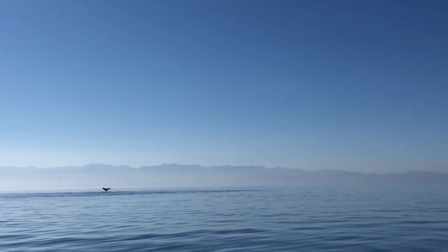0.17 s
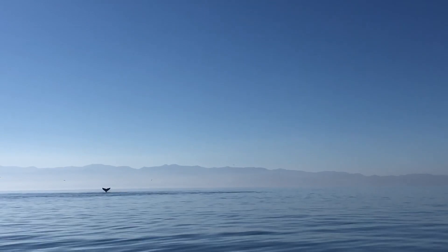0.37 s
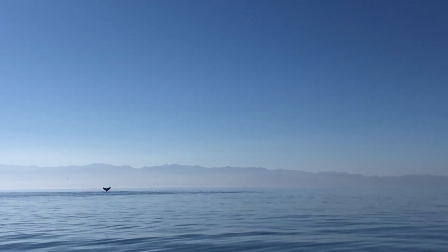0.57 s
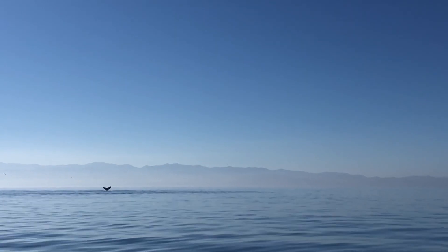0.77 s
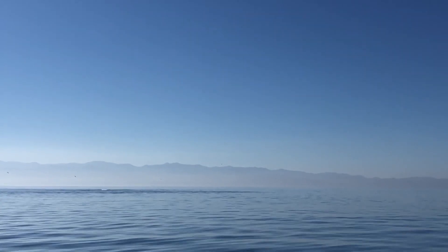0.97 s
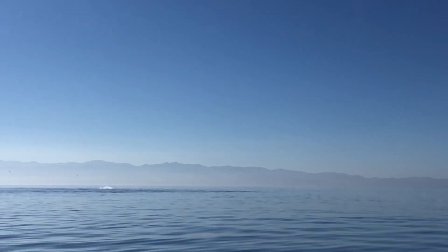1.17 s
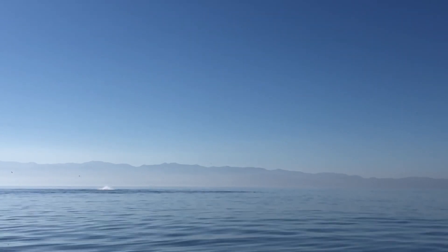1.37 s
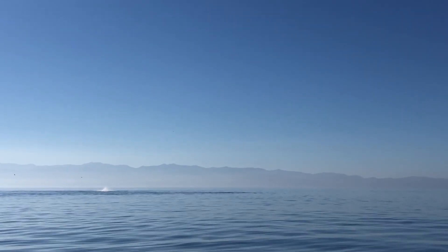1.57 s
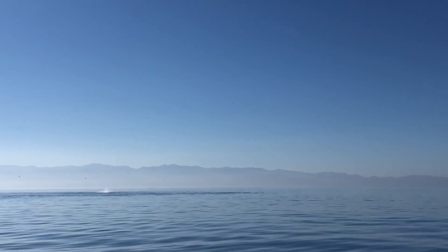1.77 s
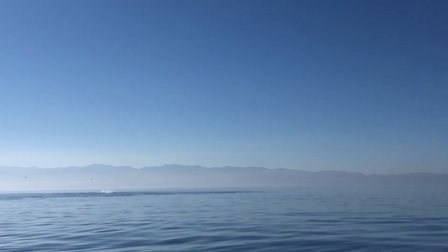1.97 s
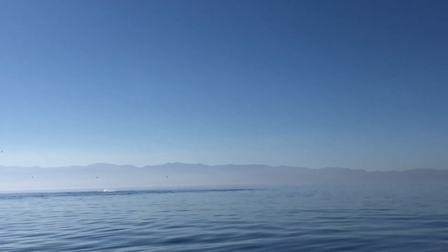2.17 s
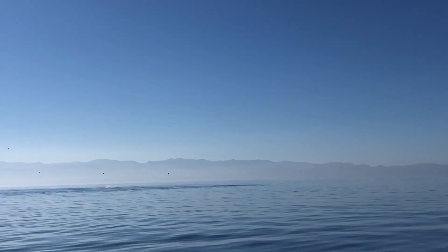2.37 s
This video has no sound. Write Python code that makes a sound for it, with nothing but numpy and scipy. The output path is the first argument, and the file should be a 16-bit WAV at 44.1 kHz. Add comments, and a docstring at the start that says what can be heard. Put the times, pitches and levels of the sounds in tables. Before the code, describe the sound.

A distant whale tail slaps the water with one short thump, over a low boat engine idle

```python
"""Calm open sea from a small boat: after a moment of silence, the close engine idles over an even sea hiss.
It is a sum of shaft-speed partials, with a low hum, a light rattle on every turn and throbbing noise.
A few droplets tick and fizz near the hull throughout, as short bands of noise and single-sample clicks.
Late on, far off, a whale slaps its tail: tearing noise bursts, a crack of short rings as the flukes land
flat, the falling tone of the trapped air as a thump, then a low noise band as bubbles rumble on."""
import sys
import numpy as np
from scipy import signal
from scipy.fft import rfft, irfft, next_fast_len
from scipy.io import wavfile
from scipy.ndimage import map_coordinates

SR = 44100
rng = np.random.default_rng(int(sys.argv[2]) if len(sys.argv) > 2 else 0)


def persist_wave(psi):
    """Save psi, clipped to +-1, as 16-bit WAV."""
    counts = np.round(np.clip(psi, -1, 1) * 32767).astype(np.int16)
    wavfile.write(sys.argv[1], SR, np.atleast_2d(counts).T)


N = 110691  # samples, about 2.5 s

SHAFT_HZ = 28.246  # mean turns of the engine shaft per second

# colour of the water thrown up by the tail: pitch_hz, relative_level_db (per Hz)
SPRAY_COLOUR = [(100, -17), (180, -17), (320, -5), (520, 2.5), (750, -7.5), (1100, 0), (1700, -2),
                (2200, -17), (3300, -13), (4300, -27.5), (5300, -39), (7000, -72)]


def undb(db):
    """Decibels to gain."""
    return 10 ** (np.asarray(db) / 20)


def clock():
    """Time of every sample, in seconds."""
    return np.arange(N) / SR


def curve(x, points):
    """Straight lines through (x, value) points."""
    return np.interp(x, *np.array(points, float).T)


def spectrum_db(hz, points):
    """Straight lines through (Hz, dB) points on a log-frequency axis."""
    point_hz, point_db = np.array(points, float).T
    return np.interp(np.log(np.maximum(hz, 1)), np.log(point_hz), point_db)


def noise(gain):
    """Noise of rms 1, shaped by a function of frequency."""
    size = next_fast_len(N)
    spectrum = rfft(rng.standard_normal(size)) * gain(np.fft.rfftfreq(size, 1 / SR))
    shaped = irfft(spectrum, size)[:N]
    return shaped / shaped.std()


def coloured(points):
    """Noise of rms 1 with a (Hz, dB) spectrum."""
    return noise(lambda hz: undb(spectrum_db(hz, points)))


def band(centre_hz, width_hz):
    """Noise of rms 1 in one resonance, its width taken at half gain."""
    return noise(lambda hz: 1 / (1 + (2 * (hz - centre_hz) / width_hz) ** 2))


def walk(rate):
    """Smooth random drift with a spread near 1, through `rate` random points a second."""
    points = rng.standard_normal(size=4096)
    coarse = map_coordinates(points, [clock()[::8] * rate], mode="wrap")
    return coarse.repeat(8)[:N]  # each value holds for 8 samples


def burst(at, rise, decay):
    """Exponential swell up to a moment and decay after it (seconds)."""
    t = clock() - at
    return np.exp(-np.maximum(-t / rise, t / decay))


def splash():
    """The edge of the tail tears into the water in a few quick bursts of noise."""
    # bursts: peak_s, peak_level_db, rise_s, decay_s
    tears = [(1.836, -43, .006, .004), (1.8502, -28, .004, .003), (1.8572, -31, .001, .002),
             (1.8612, -26, .0015, .003), (1.873, -40, .002, .002)]
    envelope = sum(undb(db) * burst(at, rise, decay) for at, db, rise, decay in tears)
    return coloured(SPRAY_COLOUR) * envelope


def crack():
    """The tail lands flat in quick blows that share the same short rings; each throws a little spray."""
    # flat blows of the flukes: start_s, strength_db
    blows = [(1.8755, -7), (1.8822, 1.5), (1.8842, -2.5)]
    # rings of each blow: pitch_hz, level_db (before the strength of the blow), t60_s
    modes = [(400, -30, .04), (740, -23, .013), (1030, -21, .012), (1460, -18, .013), (1730, -24, .011),
             (2700, -35, .008), (3500, -42, .007)]
    contact_s, spray_db, spray_decay_s = .0005, -37, .0035  # spray level before the strength
    out, spray = 0, coloured(SPRAY_COLOUR)
    for at, strength_db in blows:
        t = np.maximum(clock() - at, 0)
        rings = sum(undb(db - 60 * t / t60) * np.sin(2 * np.pi * hz * t) for hz, db, t60 in modes)
        wet = undb(spray_db) * np.exp(-t / spray_decay_s) * spray
        onset = 1 - np.exp(-(t / contact_s) ** 2)
        out = out + undb(strength_db) * (wet - rings) * onset
    return out


def thump():
    """The pocket of air under the tail rings for a few cycles, falling in pitch."""
    start_hz, end_hz, sag_s = 350, 135, .006
    rise_s, decay_s = .004, .0053
    t = np.maximum(clock() - 1.8858, 0)
    # integral of a pitch that sags exponentially
    cycles = end_hz * t + (start_hz - end_hz) * sag_s * (1 - np.exp(-t / sag_s))
    envelope = (1 - np.exp(-(t / rise_s) ** 2)) * np.exp(-t / decay_s)
    return undb(-9) * envelope * np.sin(2 * np.pi * cycles)


def churn():
    """The bubble cloud rumbles on briefly after the thump, as a narrow low band of noise."""
    return undb(-37) * burst(at=1.93, rise=.026, decay=.09) * band(centre_hz=170, width_hz=16)


def engine():
    """The idling engine: hum, clatter and a rush that throbs with the two firings of each turn."""
    # rough noise of engine and exhaust water: pitch_hz, relative_level_db (per Hz)
    rush_colour = [(25, -29), (45, -7), (110, 4.5), (160, 1.5), (220, -7.5), (360, 1), (480, -6.5),
                   (800, -15.5), (1100, -10), (1600, -23), (2250, -17.5), (2650, -26), (3150, -31),
                   (3800, -27), (4400, -33.5), (5200, -35), (6500, -41.5), (15000, -57.5)]
    # level of that noise before drift and throb: time_s, level_db
    rush_level = [(.1, -47), (.5, -47), (.95, -45), (1.2, -45.5), (1.5, -45.5), (1.8, -46.5), (2.05, -45.5),
                  (2.5, -47.5)]
    speed_wander = .00115  # share of the shaft rate
    turns = np.cumsum(SHAFT_HZ * (1 + speed_wander * walk(5.914))) / SR
    level_db = curve(clock(), rush_level) + 0.67 * walk(11.26)
    throb = 1 + 0.19 * np.sin(4 * np.pi * turns)
    rush = undb(level_db) * coloured(rush_colour) * throb
    return hum(turns) + casing(turns) + rush


def hum(turns):
    """Low partials of the exhaust, each wavering a little; two regions swell and fade."""
    # partials: order (multiple of the shaft rate), rms_level_db (before waver and swells)
    partials = [(2, -35.5), (3, -48.5), (4, -38.5), (6, -56), (7, -58.5), (8, -48.5), (9, -50.5),
                (10, -56.5), (11, -62.5), (12, -43), (14, -55)]
    # swell of the low middle of the hum: time_s, change_db
    low_swell = [(.1, 4), (.45, 5), (.6, 4), (.8, -6), (1.15, 6), (1.4, -4), (1.6, -14), (1.78, 7.5),
                 (1.95, 13.5), (2.2, 7.5), (2.45, 14.5)]
    # swell of the upper hum: time_s, change_db
    upper_swell = [(.1, 2.5), (.4, -2), (.7, -0.5), (1.1, 2.5), (1.22, -2), (1.5, 0), (1.75, -4.5),
                   (2.05, 2), (2.5, 1)]
    low_hz, low_width_hz = 186.5, 39
    upper_hz, upper_width_hz = 342, 27
    out, low, upper = 0, curve(clock(), low_swell), curve(clock(), upper_swell)
    for order, db in partials:
        hz = round(order) * SHAFT_HZ
        # 1.86 dB of waver at 300 Hz; lower partials are steadier
        db = db + 1.86 * np.sqrt(hz / 300) * walk(7)
        db = db + low * np.exp(-((hz - low_hz) / low_width_hz) ** 2)
        db = db + upper * np.exp(-((hz - upper_hz) / upper_width_hz) ** 2)
        wave = np.sin(2 * np.pi * (round(order) * turns + rng.random()))
        out = out + np.sqrt(2) * undb(db) * wave
    return out


def casing(turns):
    """A clatter that repeats on every turn, with a ring sliding upward and a thin whine."""
    # upper partials of the engine casing: pitch_hz, rms_level_db (of each partial, before waver)
    casing_colour = [(420, -66), (480, -76), (570, -60), (640, -70.5), (730, -61), (810, -77), (910, -66.5),
                     (960, -70.5), (1020, -58.5), (1090, -70.5), (1160, -62), (1230, -78), (1380, -73),
                     (1650, -82.5), (1900, -74), (2500, -94)]
    # thin engine whine: time_s, rms_level_db
    whine_level = [(.1, -69), (.9, -72.5), (1.1, -60.5), (1.4, -64), (1.8, -65), (2.1, -63), (2.5, -68.5)]
    rattle_hz, rattle_reach_hz, sweep_hz_per_s = 1089.3, 110, 5860
    whine_hz = 2258
    out = 0
    for order in range(15, 88):
        hz, offset = order * SHAFT_HZ, rng.random()
        if abs(hz - rattle_hz) < rattle_reach_hz:
            # phases that line up later for higher partials: an upward slide once a turn
            offset = -(hz - rattle_hz) ** 2 / (2 * sweep_hz_per_s)
        db = spectrum_db(hz, casing_colour) + 3 * walk(3.87)
        out = out + undb(db) * np.sin(2 * np.pi * (order * turns + offset))
    whine_phase = 2 * np.pi * whine_hz / SHAFT_HZ * turns + 0.26 * walk(35.34)
    whine = undb(curve(clock(), whine_level)) * np.sin(whine_phase)
    return np.sqrt(2) * (out + whine)


def droplets():
    """Tiny fizzes of water beside the boat, broken into grains, and the faint lone ticks of ripples."""
    # fizzes near the hull: peak_s, peak_level_db (before the grain), pitch_hz, width_hz, decay_s
    drops = [(.574, -66, 5440, 700, .004), (1.074, -70, 12400, 3500, .012),
             (1.133, -68, 9000, 4000, 0.0077), (1.139, -65.5, 7000, 2000, 0.0087),
             (1.144, -59, 4970, 700, 0.0054), (1.159, -65, 5100, 1500, 0.013),
             (1.248, -67, 6800, 1500, .002), (1.252, -61, 4900, 500, .004),
             (1.6206, -57, 7700, 650, 0.0014), (2.071, -60, 4300, 1500, .003),
             (2.257, -68.5, 8500, 6000, .002), (2.283, -73, 10300, 2000, 0.0026)]
    fizz = 0
    for at, db, hz, width, decay in drops:
        fizz = fizz + undb(db) * burst(at, .6 * decay, decay) * band(hz, width)
    grain = undb(2.5 * walk(590))
    ticks_per_s, tick_db, tick_spread_db = 14, -58, 1
    struck = rng.random(N) < ticks_per_s / SR
    ticks = struck * undb(tick_db + tick_spread_db * rng.standard_normal(N))
    return fizz * grain + ticks


def sea_hiss():
    """The even hiss of the sea, as steady noise."""
    # colour of the hiss: pitch_hz, relative_level_db (per Hz)
    hiss_colour = [(500, 11), (4000, 6.5), (7000, 2.5), (10000, 2), (16000, -1.5)]
    return undb(-73) * coloured(hiss_colour)


def scene():
    """Tail slap far away, engine, droplets and sea nearby, summed to one channel."""
    slap = splash() + crack() + thump() + churn()
    return (slap + engine() + droplets() + sea_hiss())[None]


def record(dry):
    """The sound sets in after a moment of silence; the top is cut steeply."""
    start_s, fade_s, top_hz = .036, .0003, 15750
    opened = np.clip((clock() - start_s) / fade_s, 0, 1)
    top_cut = signal.ellip(10, .2, 80, top_hz, fs=SR, output="sos")
    return signal.sosfilt(top_cut, dry * opened)


dry = scene()
out = record(dry)
persist_wave(out)
```